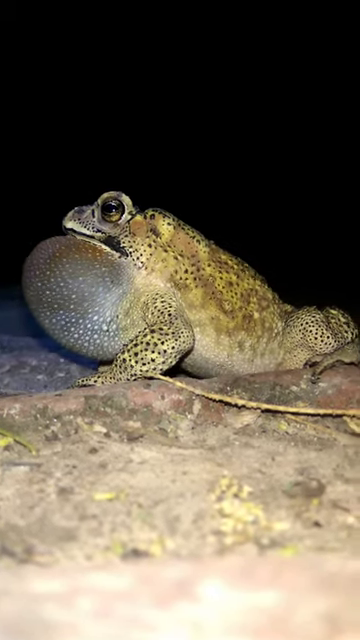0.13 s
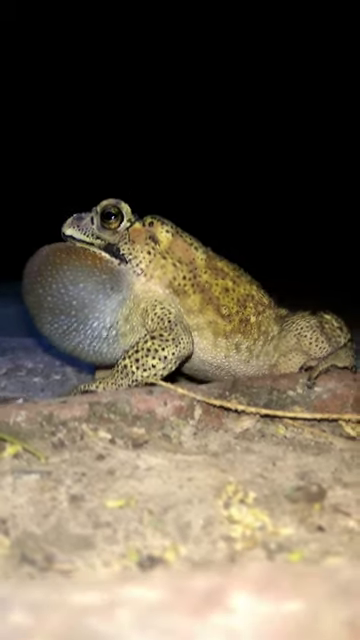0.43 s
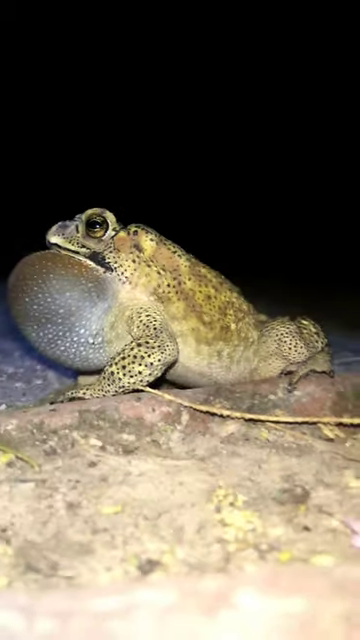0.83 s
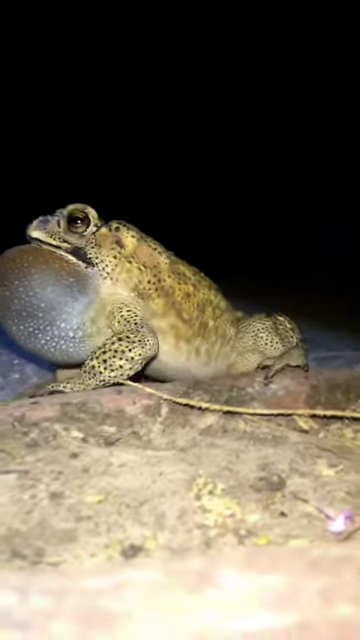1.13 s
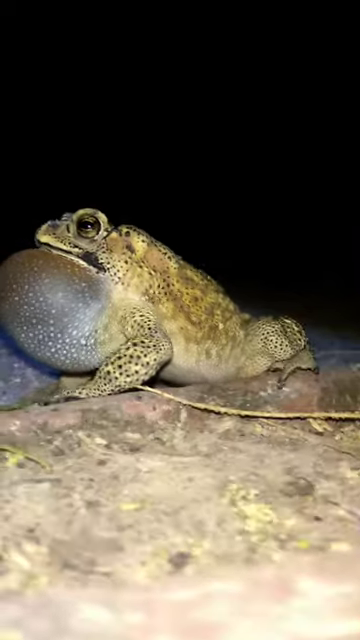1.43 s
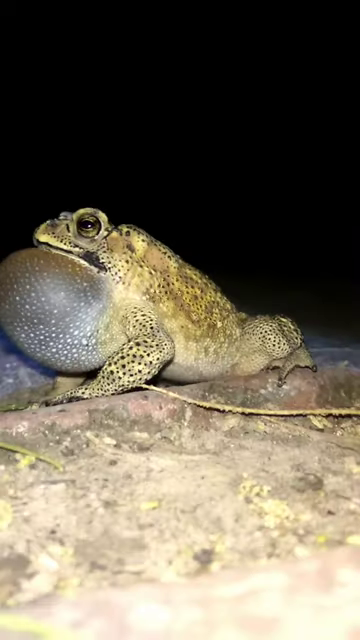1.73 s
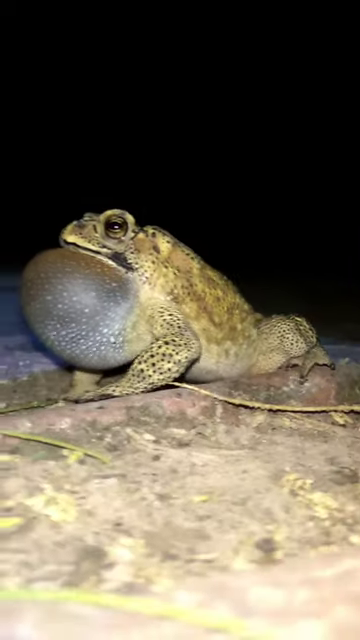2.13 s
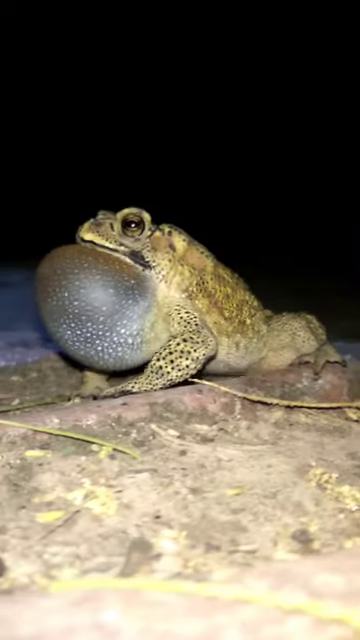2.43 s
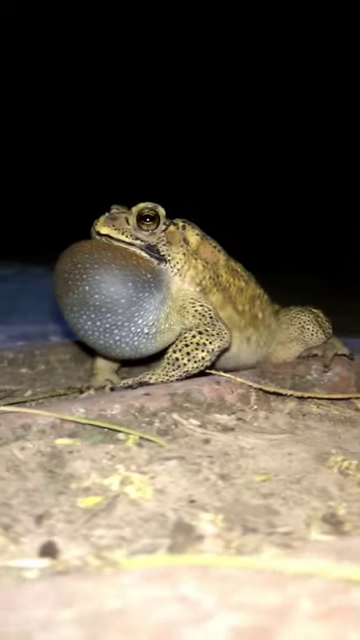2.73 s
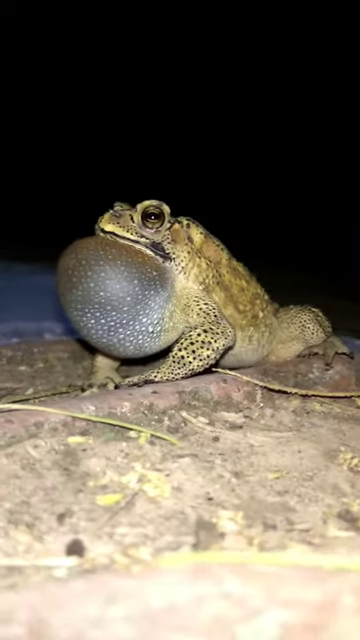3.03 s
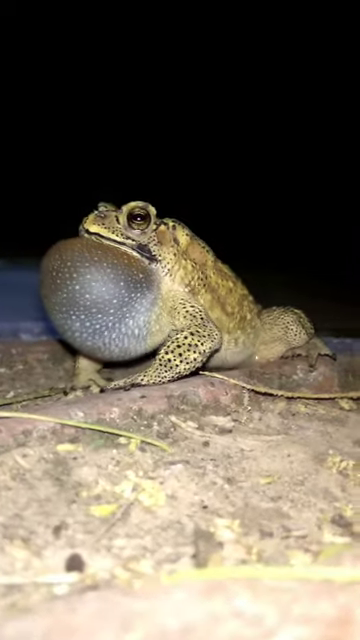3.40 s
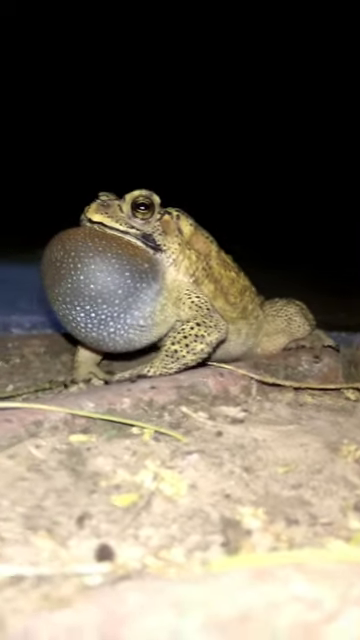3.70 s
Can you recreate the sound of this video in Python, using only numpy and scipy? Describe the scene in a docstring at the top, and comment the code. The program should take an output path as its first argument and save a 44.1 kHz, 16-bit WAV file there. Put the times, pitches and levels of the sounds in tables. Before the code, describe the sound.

A toad calls close to the microphone outdoors at night, repeating short, ringing notes in a fast, even train. The call is loud and slightly distorted, with faint ticks between notes and a distant toad chorus behind.

```python
"""Outdoors at night, a toad calls close to a phone, about nine short notes a second.
Each note is three to five pulses that ring the vocal sac, a resonator; the last is held and sags
in pitch. Faint ticks and soft gulps fall between notes, and distant toads throb over faint night air.
Ground and plants scatter a little of the call, which overloads both microphone ports."""
import sys
import numpy as np
from scipy import signal
from scipy.fft import rfft, irfft
from scipy.io import wavfile
from scipy.ndimage import uniform_filter1d, map_coordinates

SR = 44100
rng = np.random.default_rng(int(sys.argv[2]) if len(sys.argv) > 2 else 0)


def materialize(psi):
    """Save the field psi as 16-bit PCM at rate SR to the path in sys.argv[1].

    A 1-D psi becomes a single channel; in a 2-D psi each row is a channel.
    """
    bounded = np.clip(np.atleast_2d(psi).T, -1, 1)
    quanta = np.round(bounded * 32767).astype(np.int16)
    wavfile.write(sys.argv[1], SR, quanta)


N = 170226

# Noise spectrum of the toad's rasp and of the ticks: f/Hz, relative level/dB
RASP_SPECTRUM = [(30, -11.5), (130, -8), (240, -7.5), (350, -13), (600, -4.5), (880, 2), (1500, -5),
                 (1950, -4.5), (2400, -15), (2800, -9), (3400, -14), (6000, -20.5), (11000, -47.5),
                 (16000, -45)]


def undb(db):
    """Amplitude ratio of a level in decibels."""
    return 10 ** (np.asarray(db) / 20)


def colour(x, points):
    """Zero-phase filtering by a curve of (f/Hz, level/dB) points."""
    hz, db = np.array(points, float).T
    f = np.maximum(np.arange(N // 2 + 1) * SR / N, 1)
    return irfft(rfft(x) * undb(np.interp(np.log(f), np.log(hz), db)), N)


def noise(points):
    """Spectrally shaped Gaussian noise of unit rms."""
    x = colour(rng.standard_normal(N), points)
    return x / x.std()


def wander(rate_hz):
    """Low-pass noise of unit spread, for random modulation."""
    width = max(int(SR / rate_hz), 1)
    x = uniform_filter1d(uniform_filter1d(rng.standard_normal(N), width), width)
    return x / x.std()


def ramp(u):
    """Raised-cosine step from 0 to 1."""
    return np.sin(np.pi / 2 * np.clip(u, 0, 1)) ** 2


def add(out, start, x):
    """Superposition of x on out from a sample index on."""
    a, b = max(start, 0), min(start + len(x), N)
    out[a:b] += x[a - start:b - start]


def night_air():
    """Partial coherence: soft noise common to both ports, plus a weaker part in antiphase."""
    spectrum = [(25, -2.5), (60, -20), (130, -4.5), (300, -15), (500, -16.5), (1000, -16), (1800, -17),
                (3500, -44.5), (6000, -41), (15000, -54.5)]  # night air: f/Hz, relative level/dB
    common = noise(spectrum)
    antiphase = undb(-5) * noise(spectrum) * np.array([[1], [-1]])
    return undb(-57.5) * (common + antiphase)


def distant_toads():
    """Incoherent summation: many far calls blur into throbbing bands of noise."""
    bands = [(1486, 160, -50), (1270, 270, -61.5), (2790, 100, -76.5)]  # chorus bands: centre f/Hz, half-width f/Hz, level/dB
    out = 0
    for hz, width, db in bands:
        band = [(hz / 2, -70), (hz - width, -14), (hz, 0), (hz + width, -14), (hz * 2, -70)]
        throb_db = wander(36)
        out = out + undb(db - throb_db) * np.array([noise(band), noise(band)])
    return out


def sac_note(t, resume, held, length, hz, second_db, held_db):
    """Pulsed resonance: each pulse rings the vocal sac, choking the one before; the last is held."""
    second_pulse_s, spacing_s = .0098, .0083
    first_attack_s, attack_s, hold_s, ring_s, choke_s = .0036, .0016, .004, .0026, .0009
    swell_s, fade_db_per_s, release_s, end_ring_s = .005, 370, .0012, .0014
    sag_hz, sag_s, detune, closing_s = 122, .017, .008, .0075
    later = np.linspace(resume, held, 1 + int(round(max(held - resume, 0) / spacing_s)))
    starts = np.r_[0, second_pulse_s, later]
    chance = rng.standard_normal((12, 3))  # per pulse: level, tuning, phase
    pitch = hz - sag_hz * np.clip(1 + (t - length) / sag_s, 0, 2) ** 2.4
    # The second harmonic strengthens as the note closes.
    octave_gain = undb(-29.5) + undb(-24.5) * ramp(2 * (t - length + closing_s) / closing_s + .5)
    tone, octave, snap_env = 0, 0, 0
    for k, start in enumerate(starts):
        age = np.maximum(t - start, 0)
        env = ramp(age / (attack_s if k else first_attack_s))
        if k == len(starts) - 1:
            db = held_db
            env *= undb(-fade_db_per_s * np.maximum(age - swell_s, 0))
            env /= 1 + np.exp(np.minimum((t - length + release_s) / end_ring_s, 20))
        else:
            db = .56 if k == 0 else second_db if k == 1 else 0
            env /= np.sqrt(1 + np.exp(np.minimum(2 * (age - hold_s) / ring_s, 20)))
            if k > 0 or second_db > -20:  # a very weak second pulse lets the first ring on
                env *= 1 - ramp((t - starts[k + 1]) / choke_s)
        gain = undb(db - .66 * chance[k, 0])
        phase = 2 * np.pi * (np.cumsum(pitch) * (1 + detune * chance[k, 1]) / SR + chance[k, 2])
        tone += gain * env * np.exp(1j * phase)
        octave += gain * env * octave_gain * np.exp(2j * phase)
        snap_env += gain * (t > start) * np.exp(-age / .0034)
    return tone, octave, snap_env


def toad():
    """Random phase and amplitude modulation roughen the notes. Returns call and second harmonic."""
    # Notes: onset t/s; from onset, pulsing resumes t/s, held pulse t/s, end t/s;
    # pitch f/Hz; relative level/dB of the note, of its second pulse and of its held pulse
    notes = [(-0.0005, 0.0179, 0.0179, 0.034, 1350, -2.1, 0, -1.3),
             (0.1017, 0.0205, 0.0314, 0.046, 1345, -3.1, -40, -6.0),
             (0.2173, 0.0175, 0.0175, 0.037, 1346, -1.2, 0, 0.6),
             (0.3205, 0.0176, 0.0176, 0.035, 1354, -1.4, 0, -0.0),
             (0.4249, 0.018, 0.018, 0.035, 1357, -0.8, 0, -0.0),
             (0.5204, 0.0205, 0.0357, 0.047, 1358, -1.4, -40, -6.0),
             (0.6377, 0.0175, 0.0175, 0.037, 1353, -0.6, 0, 0.4),
             (0.7314, 0.0169, 0.0254, 0.039, 1365, 0.4, 0, -1.1),
             (0.8339, 0.0209, 0.0367, 0.049, 1363, -0.5, -6, -2.5),
             (0.9481, 0.0177, 0.0251, 0.039, 1363, -0.1, 0, -1.3),
             (1.0492, 0.023, 0.0382, 0.05, 1360, -0.5, 0, -3.0),
             (1.1638, 0.0205, 0.0363, 0.048, 1360, -1.1, 0, -6.0),
             (1.2755, 0.0176, 0.0366, 0.051, 1367, 0.3, 0, -4.6),
             (1.3917, 0.0229, 0.0341, 0.048, 1363, -0.1, 0, -4.6),
             (1.5043, 0.0208, 0.0356, 0.049, 1363, 0.0, 0, -2.0),
             (1.6144, 0.0214, 0.038, 0.051, 1367, 0.2, 0, -3.3),
             (1.7259, 0.0205, 0.0384, 0.047, 1367, 0.1, 0, -6.0),
             (1.8338, 0.0168, 0.0346, 0.052, 1370, 1.0, 0, 1.3),
             (1.9451, 0.0255, 0.0431, 0.057, 1370, -0.1, 0, -0.8),
             (2.0636, 0.0228, 0.0339, 0.051, 1370, -0.4, 0, -0.9),
             (2.1784, 0.0213, 0.037, 0.05, 1363, 0.5, 0, -1.5),
             (2.2886, 0.0239, 0.0393, 0.054, 1370, 0.4, 0, 0.7),
             (2.4007, 0.0233, 0.0396, 0.056, 1377, 1.2, 0, 1.1),
             (2.516, 0.022, 0.0368, 0.054, 1370, 0.7, 0, 1.7),
             (2.6311, 0.0205, 0.0388, 0.051, 1370, 0.5, -40, -3.2),
             (2.7467, 0.0203, 0.0361, 0.056, 1363, 1.4, 0, 1.1),
             (2.865, 0.019, 0.0366, 0.05, 1363, 0.5, 0, -1.2),
             (2.9911, 0.0205, 0.0371, 0.049, 1363, 0.3, -40, -5.3),
             (3.1131, 0.0205, 0.0365, 0.052, 1350, 0.4, -17, 0.4),
             (3.2284, 0.0219, 0.0399, 0.057, 1363, 0.3, -6, 1.2),
             (3.3442, 0.0224, 0.0408, 0.052, 1377, 0.4, 0, -3.4),
             (3.461, 0.022, 0.0382, 0.054, 1363, 1.1, 0, 1.5),
             (3.5759, 0.0182, 0.0369, 0.05, 1363, 1.1, 0, -2.9),
             (3.6869, 0.0222, 0.0384, 0.056, 1363, 1.5, 0, 1.1),
             (3.813, 0.0173, 0.0173, 0.033, 1357, 1.1, 0, 0.0)]
    t = np.arange(SR // 10) / SR
    tone, octave, snap_env = np.zeros(N, complex), np.zeros(N, complex), np.zeros(N)
    for start, resume, held, length, hz, db, second_db, held_db in notes:
        parts = sac_note(t, resume, held, length, hz, second_db, held_db)
        for track, part in zip((tone, octave, snap_env), parts):
            add(track, int(start * SR), undb(db) * part)
    throat = [(1500, -14), (2300, -1), (2560, 0), (2850, -8), (4000, -18)]  # throat response for the second harmonic: f/Hz, level/dB
    waver_cycles, shimmer_db, gain = .011, .8, undb(2)
    waver = np.exp(2j * np.pi * waver_cycles * wander(600))
    voice = np.imag(tone * waver) * undb(shimmer_db * wander(460))
    # Noise snaps at each opening and rides on the tone.
    rasp = noise(RASP_SPECTRUM) * (undb(-26.5) * snap_env + undb(-36) * abs(tone))
    return gain * (voice + rasp), gain * colour(np.imag(octave * waver ** 2), throat)


def ports(x, lag_s):
    """Path difference: sound reaches the left port later than the right, and slightly louder."""
    delayed = map_coordinates(x, [np.arange(N) - lag_s * SR], mode="nearest")
    return np.array([undb(.5) * delayed, x])


def port_rasp(call):
    """Amplitude modulation: noise, independent at each port, follows the envelope of the call."""
    spectrum = [(30, 10.5), (110, -6), (300, -16.5), (900, -22), (1900, -13), (2700, 6.5), (3400, -8.5),
                (4400, -10), (5200, -5.5), (12000, -27.5), (16000, -46.5)]  # rasp at the ports: f/Hz, relative level/dB
    envelope = uniform_filter1d(abs(call), size=128)
    return envelope * undb(-27.5) * np.array([noise(spectrum), noise(spectrum)])


def diffuse_tail(x, db, t60_s):
    """Diffuse decay: convolution with exponentially fading noise, different at each port."""
    t = np.arange(SR // 2) / SR
    tail = rng.standard_normal((2, len(t))) * np.exp(-np.log(1000) * t / t60_s)
    tail /= np.sqrt((tail ** 2).sum(axis=1, keepdims=True))
    return undb(db) * signal.fftconvolve(x[None], tail, axes=1)[:, :N]


def ticks():
    """Broadband transients: faint noise bursts that rise and fall exponentially."""
    events = [(0.297, -39), (1.796, -44.5), (1.913, -57)]  # ticks: peak t/s, level/dB
    t, decay_s = np.arange(N) / SR, .0025
    envelope = sum(undb(db) * np.exp(-abs(t - at) / decay_s) for at, db in events)
    return envelope * noise(RASP_SPECTRUM)


def gulps():
    """Downward chirps: each soft gulp is a low, falling tone under a Gaussian envelope."""
    events = [(1.717, -42), (1.797, -33), (1.826, -38), (1.915, -34.5), (2.030, -34.5), (2.056, -62),
              (2.514, -47), (2.745, -50)]  # gulps: peak t/s, level/dB
    hz, sag_hz_per_s, width_s = 440, 9000, .0015
    out = np.zeros(N)
    for at, db in events:
        t = np.arange(N) / SR - at
        envelope = undb(db) * np.exp(-.5 * (t / width_s) ** 2)
        out += envelope * np.sin(2 * np.pi * (hz - sag_hz_per_s * t / 2) * t)
    return out


def scene():
    """Superposition at two ports: the call, its scatter from ground and plants, and the background."""
    call, octave = toad()
    direct = ports(call, lag_s=.00021) + ports(octave, lag_s=.0001)
    echo = diffuse_tail(call + octave, db=-29, t60_s=.08)
    scatter = diffuse_tail(call + octave, db=-27, t60_s=.02)
    return direct + port_rasp(call) + echo + scatter + ticks() + gulps() + night_air() + distant_toads()


def record(dry):
    """Symmetric saturation at each port adds odd harmonics; the treble is coloured and the top cut."""
    linger_band = [(1500, -61), (3000, -6), (4200, 7), (6000, 9.5), (15000, -1)]  # treble that lingers briefly: f/Hz, relative level/dB
    # Treble colour of the overloaded call, with dips between its odd harmonics: f/Hz, level/dB
    overtone_colour = [(2700, 7.5), (3750, -7.5), (4200, -0.5), (4700, -2), (5600, -1.5), (6750, -1),
                       (7300, 5), (8300, -3), (9600, 0), (11300, 2.5), (12300, 6), (13800, -7),
                       (15000, -4.5)]
    clip_level, knee, flat_to_hz, top_hz = .6, 14, 1800, 15700
    clipped = dry / (2 + abs(dry / clip_level) ** knee) ** (1 / knee)
    linger = diffuse_tail(colour(clipped[1], linger_band), db=-21, t60_s=.044)
    heard = colour(clipped + linger, [(flat_to_hz, 0)] + overtone_colour)
    return signal.sosfilt(signal.ellip(8, .2, 70, top_hz, fs=SR, output="sos"), heard)


dry = scene()
out = record(dry)
materialize(out)
```